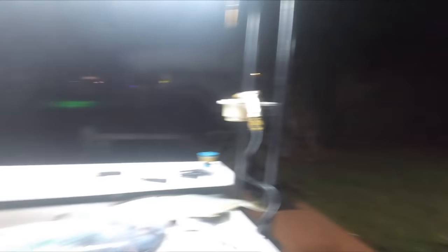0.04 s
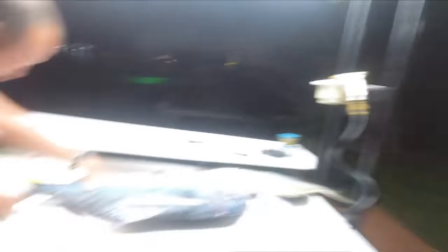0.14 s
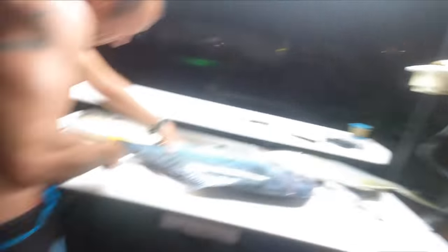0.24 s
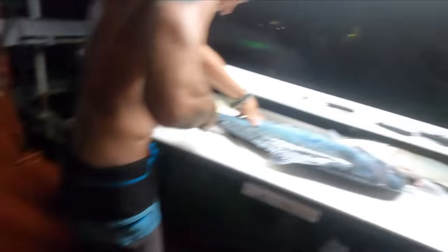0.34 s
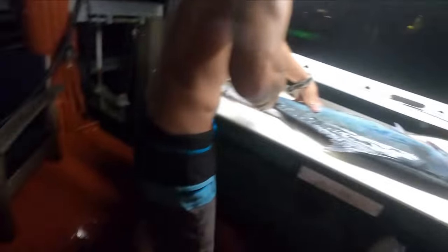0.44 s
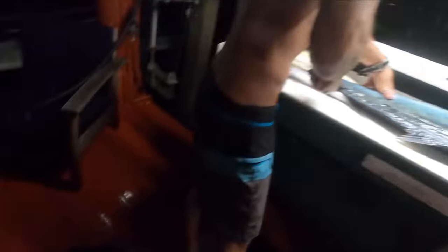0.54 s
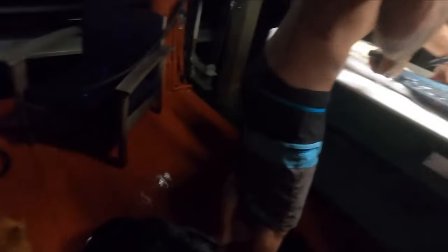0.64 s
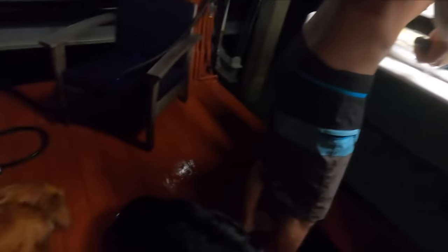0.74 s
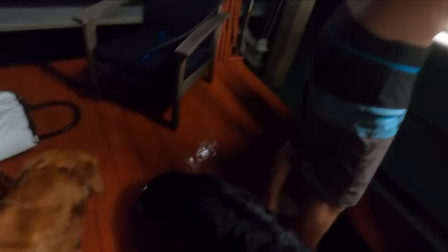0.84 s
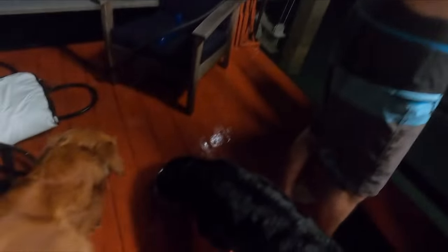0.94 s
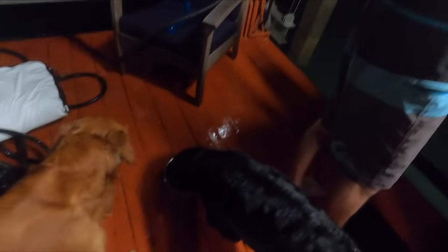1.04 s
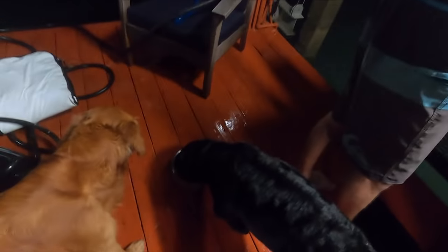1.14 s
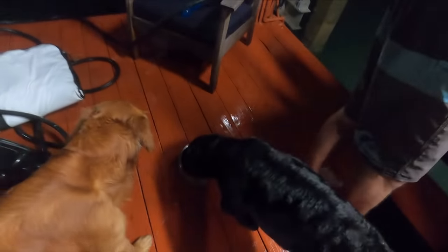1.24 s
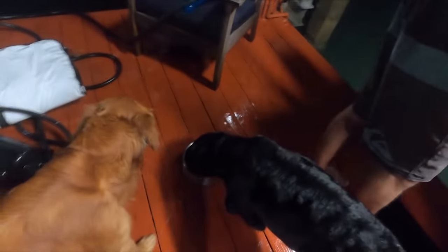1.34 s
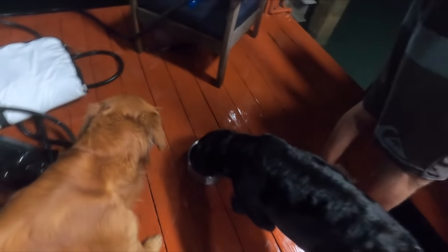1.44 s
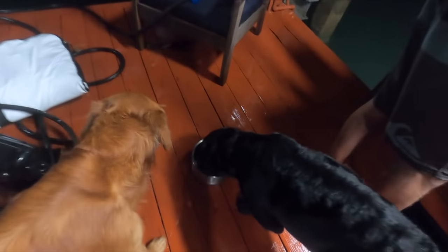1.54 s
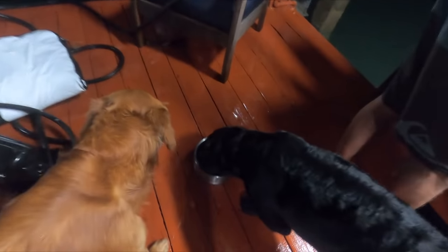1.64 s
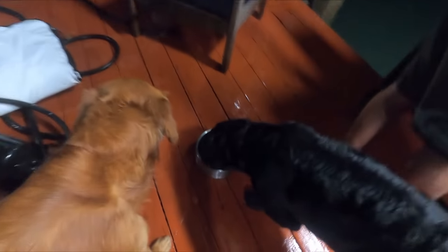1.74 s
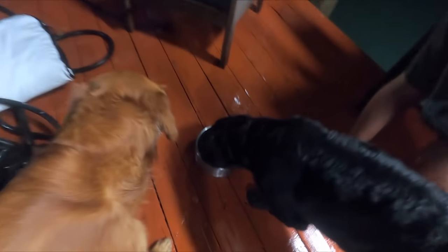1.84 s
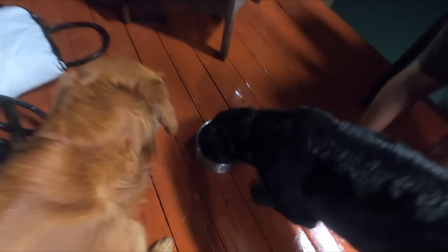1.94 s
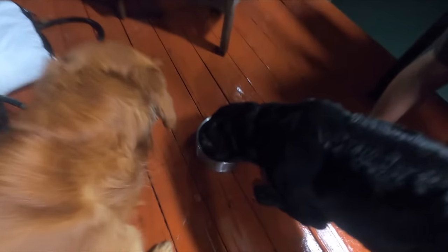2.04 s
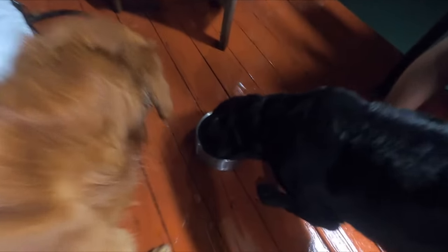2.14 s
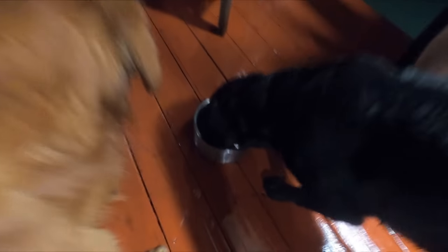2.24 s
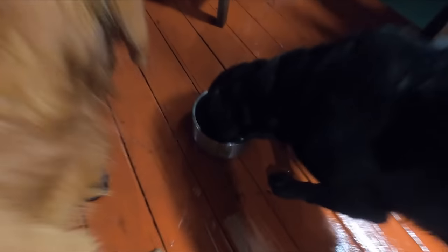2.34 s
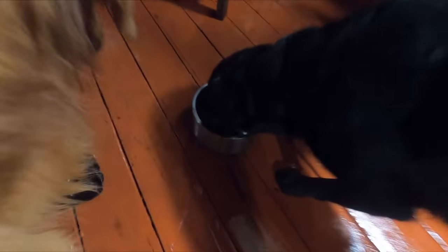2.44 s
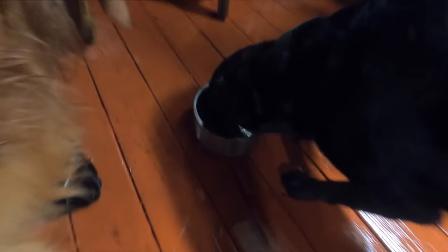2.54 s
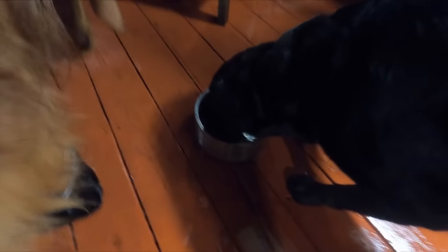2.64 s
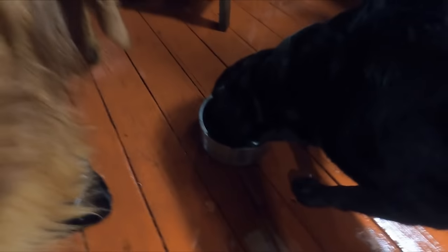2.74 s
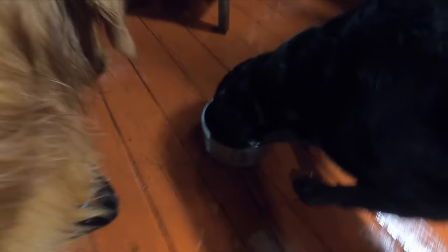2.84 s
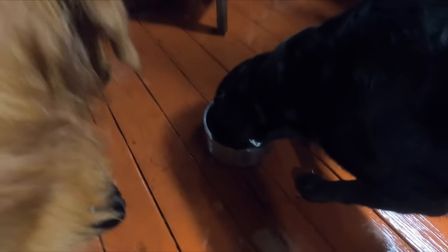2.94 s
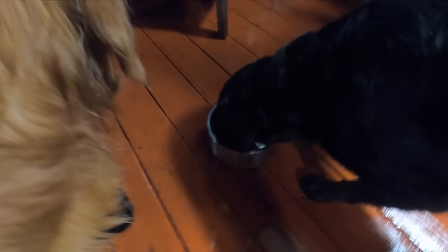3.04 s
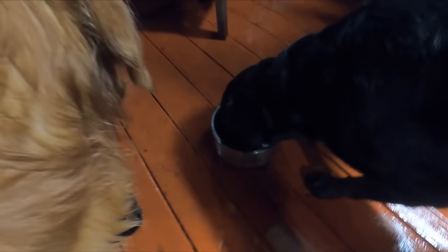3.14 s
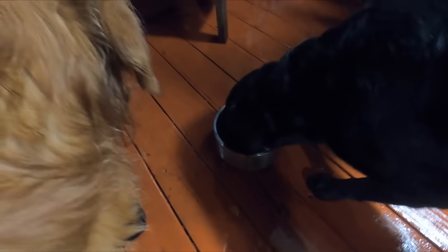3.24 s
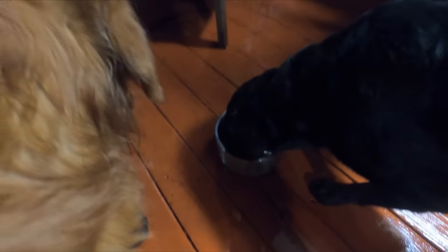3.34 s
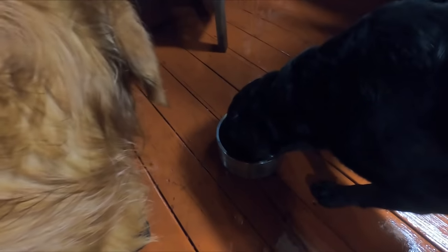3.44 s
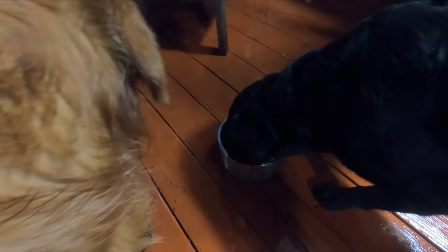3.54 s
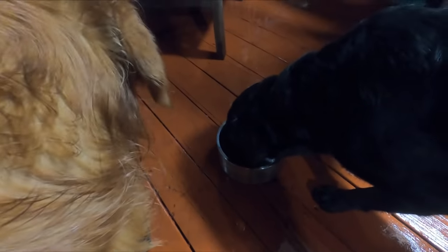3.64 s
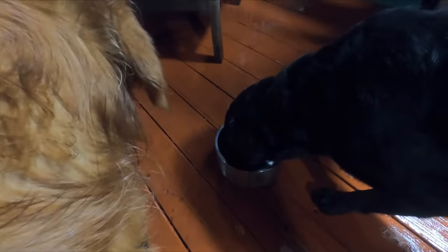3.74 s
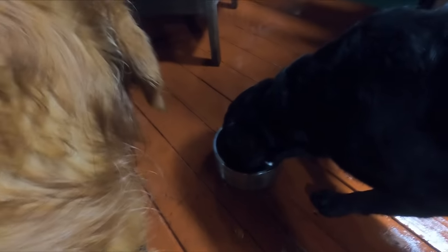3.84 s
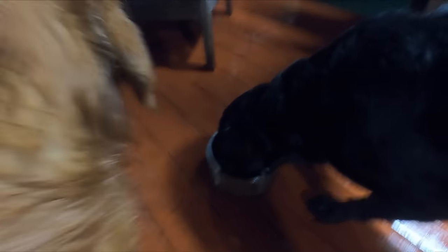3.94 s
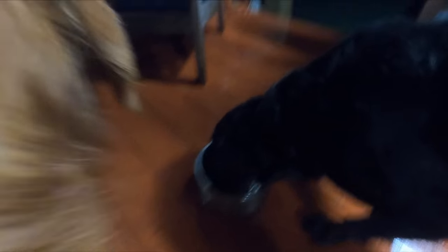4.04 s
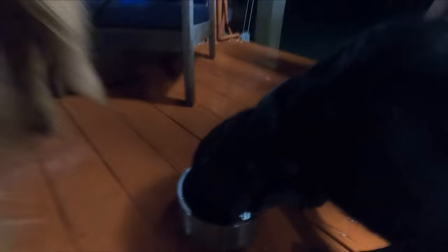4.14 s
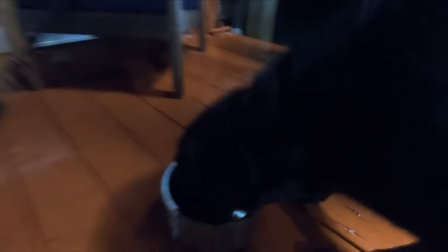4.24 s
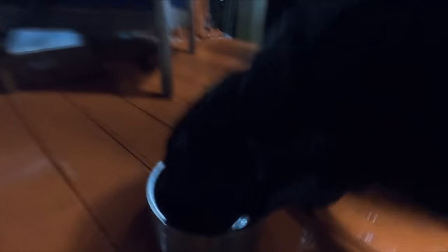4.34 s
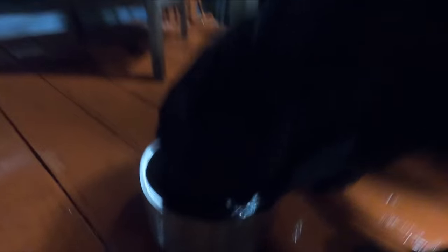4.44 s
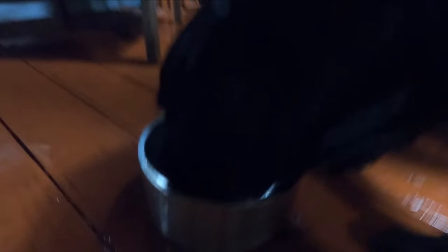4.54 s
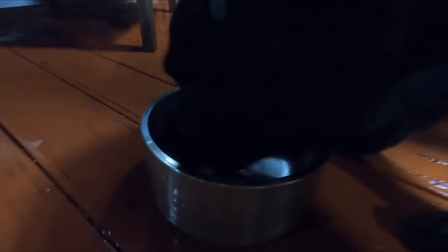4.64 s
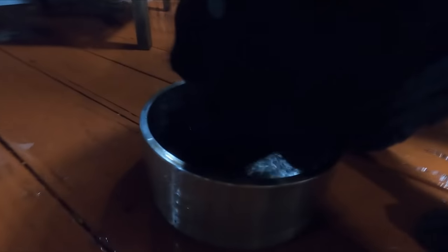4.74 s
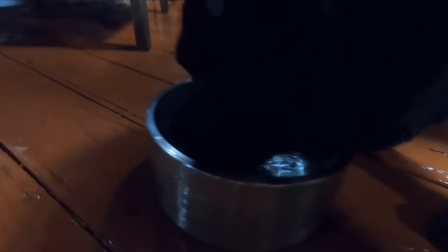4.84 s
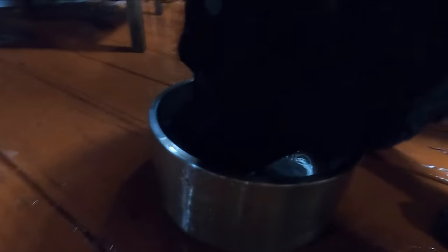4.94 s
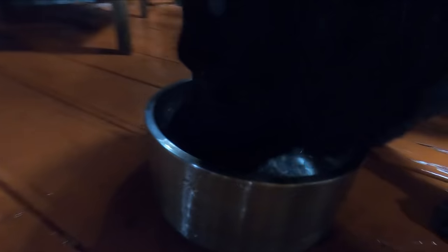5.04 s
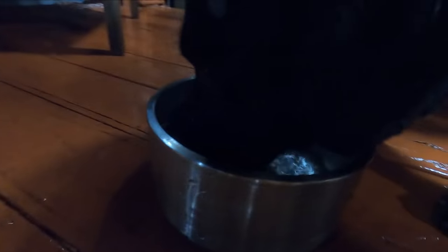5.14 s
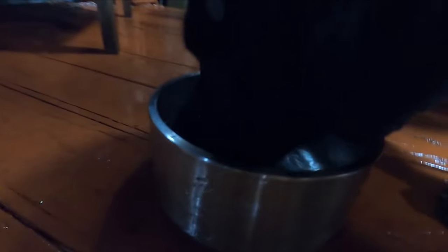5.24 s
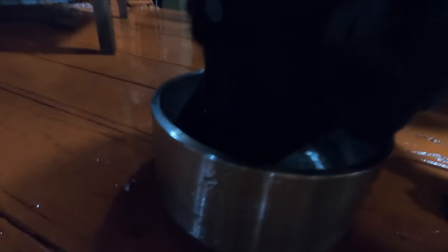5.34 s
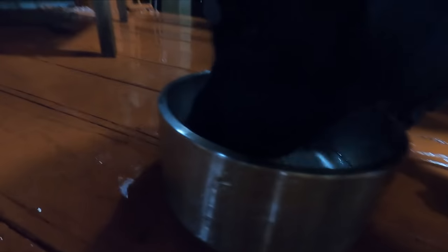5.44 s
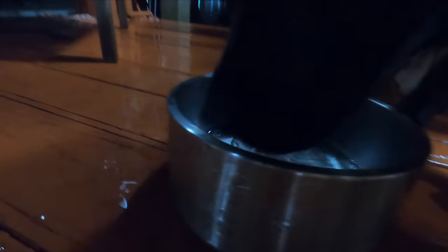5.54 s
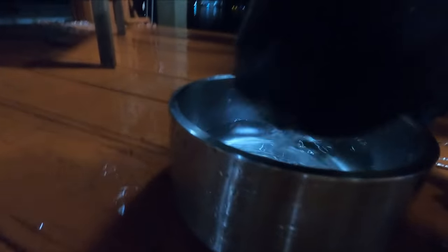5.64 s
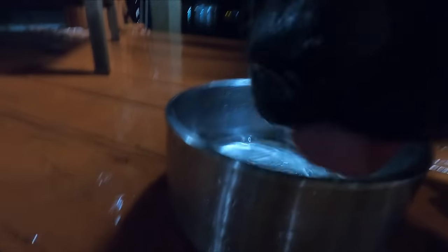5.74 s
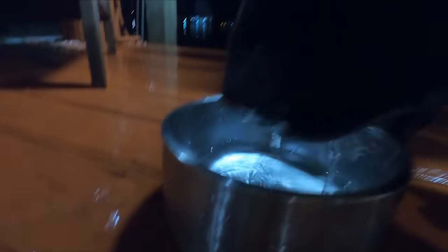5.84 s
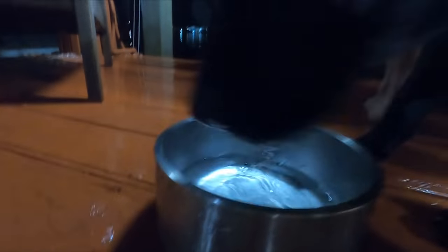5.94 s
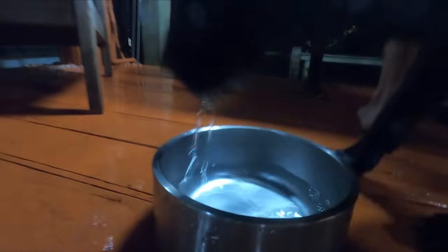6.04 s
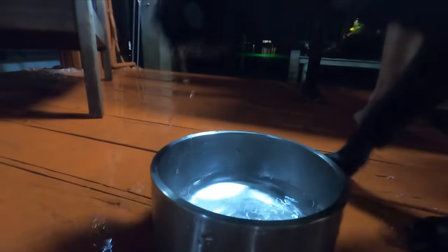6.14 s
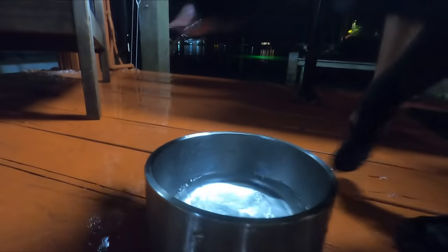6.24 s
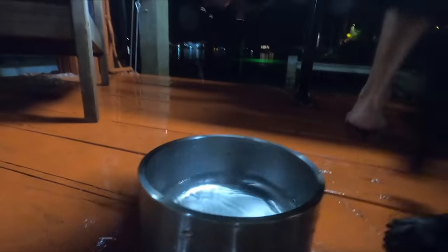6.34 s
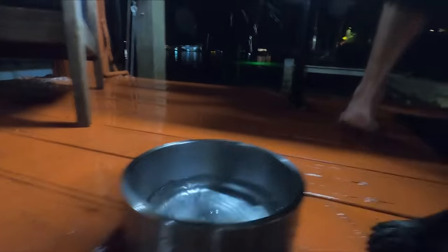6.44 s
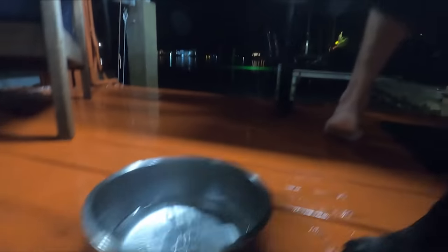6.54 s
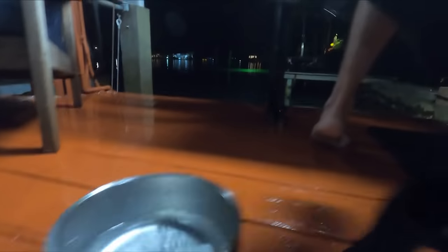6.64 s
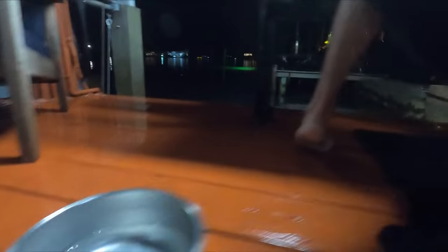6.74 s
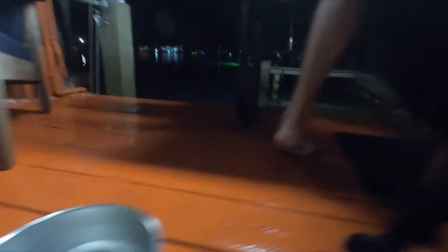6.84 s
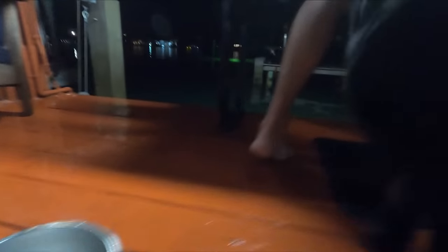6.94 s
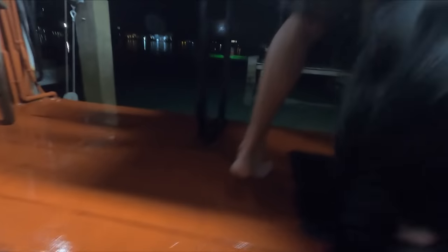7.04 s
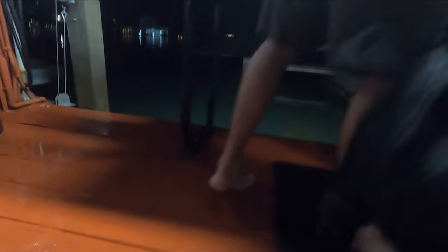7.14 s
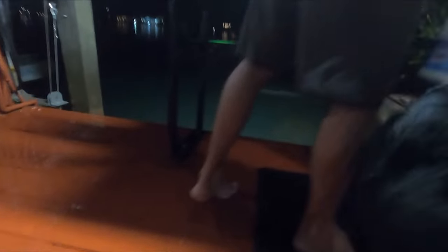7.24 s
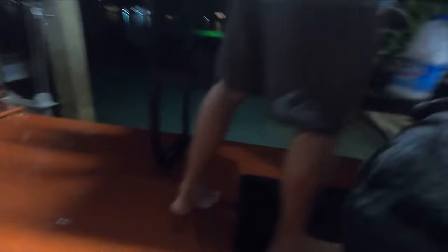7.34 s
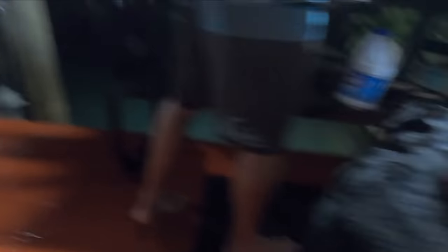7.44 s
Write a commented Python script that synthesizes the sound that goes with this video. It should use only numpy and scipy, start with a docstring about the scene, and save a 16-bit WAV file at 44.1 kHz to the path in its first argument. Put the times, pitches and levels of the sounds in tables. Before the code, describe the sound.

Outdoors at night on a wooden deck, a quiet low rumble, soft hiss, faint wavering hum and distant trickle run throughout. From 0 s a dog laps water, quietly and sparsely at first, to the left, then centred from about 1 s. Each lap, roughly three or four a second, is a tight cluster of wet slaps, short rising bubble plops, frothy gurgle and crisp spray. The laps grow fuller from 2.5 s and are loudest and closest between 4.7 and 5.5 s, with deep bubbly plunges and short bright reflections. Faint steel taps come at 5.5 and 5.7 s, and a clearer ringing knock at 6.1 s ends the drinking. Drips tick at 6.4-6.5 s and again near 6.9-7.1 s among soft paw pats. Low dull footfalls land at 6.9 and 7.35-7.45 s, while a board creaks faintly from 7.2 s to the end, about 7.5 s.

```python
"""A dog laps water fast from a steel bowl on a wooden deck at night, close to a handheld camera.
Each lap is a plunge, a pull and a snap of the tongue: noisy swarms of short rings make froth, spray and mist,
and single gliding sines the clear bubbles. Damped sines also give the knocked bowl, paws, footfalls and a
creaking board as the dog leaves; drips are short strokes. Under it all lie shaped-noise rumble and hiss,
a faint wavering hum and a distant trickle."""
import sys
import numpy as np
from scipy import signal
from scipy.io import wavfile
from scipy.ndimage import uniform_filter1d

SR = 44100
rng = np.random.default_rng(int(sys.argv[2]) if len(sys.argv) > 2 else 0)


def magnitude_from_level(level_db):
    """Linear magnitude for a level in decibels (20 dB per decade)."""
    exponent = np.asarray(level_db, float) / 20
    return 10 ** exponent


def master_out(mix):
    """Clip the mix to full scale and print it as 16-bit PCM to the path in sys.argv[1]."""
    frames = np.transpose(np.atleast_2d(mix))
    ceiling = np.clip(frames, -1, 1)
    pcm = np.round(ceiling * 32767).astype(np.int16)
    wavfile.write(sys.argv[1], SR, pcm)


N = 329679

# strokes of tongue and muzzle through the water, several to a lap:
# [t/s, relative froth level/dB, relative spray level/dB, froth t60/s]
STROKES = [(0.019, -23, -55, 0.037), (.308, -16, -43, 0.045), (.332, -21, -25.5, 0.04),
           (0.412, -26, -29, 0.071), (0.619, -26.5, -36.5, 0.52), (0.705, -36, -34, .19),
           (0.749, -19, -33, 0.033), (1.025, -19, -23, 0.091), (1.088, -26, -29, .15),
           (1.135, -13.5, -31.5, 0.068), (1.205, -27, -34, 0.05), (1.332, -23, -48, 0.14),
           (1.358, -27.5, -28.5, 0.28), (1.402, -30, -23.5, 0.075), (1.459, -18, -29, 0.045),
           (1.477, -48, -24, 0.038), (1.737, -19.5, -30, 0.22), (1.803, -38, -21.5, 0.075),
           (1.862, -23, -19.5, 0.075), (1.962, -37, -29, 0.32), (2.076, -17.5, -39, .052),
           (2.101, -32, -29, .04), (2.131, -24, -17.5, 0.046), (2.183, -26.5, -26.5, 0.28),
           (2.47, -12.5, -34, 0.1), (2.515, -25, -25, .06), (2.531, -31.5, -23.5, 0.08),
           (2.595, -20.5, -25, 0.096), (2.802, -19, -33, 0.06), (2.828, -20, -24, 0.11),
           (2.877, -14.5, -23, 0.035), (2.913, -17.5, -35, 0.16), (2.934, -31, -25, 0.042),
           (3.087, -30, -41, 0.071), (3.209, -22, -47, 0.041), (3.225, -11.5, -32, 0.082),
           (3.257, -31, -25, 0.042), (3.273, -31, -25.5, 0.36), (3.343, -14, -37, 0.056),
           (3.551, -14.5, -38, 0.15), (3.574, -14, -19, 0.03), (3.63, -19, -21, 0.06),
           (3.669, -11, -55, 0.068), (3.686, -23, -19.5, 0.032), (3.826, -22.5, -56, 0.044),
           (3.967, -13.5, -33, 0.1), (4.027, -21, -23.5, 0.19), (4.101, -18, -19.5, 0.057),
           (4.238, -23.5, -65, 0.029), (4.311, -10, -45, 0.13), (4.329, -33, -27, 0.084),
           (4.359, -41, -17.5, 0.066), (4.376, -11.5, -25, 0.032), (4.419, -17, -24.5, 0.13),
           (4.521, -29, -33.5, 0.04), (4.583, -27.5, -54, 0.14), (4.713, -3.5, -28.5, 0.067),
           (4.764, -13, -15.5, 0.1), (4.829, -10, -22, 0.068), (4.849, -27, -25.5, 0.083),
           (4.98, -21.5, -55, 0.022), (5.051, -9.5, -28, .15), (5.074, -25, -26, 0.12),
           (5.123, -10, -24, 0.031), (5.146, -45, -36, 0.028), (5.159, -10, -39, 0.067),
           (5.171, -25, -26, 0.12), (5.46, -10.5, -44, 0.063), (5.507, -11.5, -14.5, 0.019),
           (5.536, -28, -37, 0.38), (5.601, -25, -33.5, 0.14), (5.643, -46, -27, .087),
           (5.727, -56, -28.5, 0.041), (5.83, -32, -28, 0.023), (5.863, -17.5, -23.5, 0.034),
           (5.887, -14.5, -18.5, 0.037), (5.899, -10.5, -62, 0.028), (5.93, -14, -47, 0.03),
           (5.972, -28, -25.5, 0.093), (6.004, -24, -22, 0.029), (6.04, -21.5, -33, .028),
           (6.079, -27, -47, 0.044)]
# drips on the wet boards: [t/s, relative spray level/dB]
DRIPS = [(6.3666, -21), (6.4057, -26.5), (6.477, -63), (6.5053, -18), (6.8663, -22), (6.9444, -34.5),
         (7.132, -31.5)]


def evened(x):
    """Scales to rms 1."""
    return x / np.sqrt(np.mean(x ** 2) + 1e-20)


def read(points, hz):
    """Reads a spectrum on a log-frequency axis."""
    f, value = np.transpose(points)
    return np.interp(np.log(hz + 1), np.log(f + 1), value)


def add(mix, s, sound):
    """Mixes a sound in at a time in seconds."""
    part = mix[max(round(s * SR), 0):][:len(sound)]
    part += sound[:len(part)]


def ring(hz, t60, rise_s, glide=0.):
    """A damped sine with a soft start; with a glide it climbs, as a bubble does on nearing the surface."""
    t = np.arange(int(t60 * SR) + 64) / SR
    shape = (1 - np.exp(-t / max(rise_s, 1e-5))) * magnitude_from_level(-60 * t / t60)
    phase = 2 * np.pi * hz * t * (1 + glide * t / t60)
    return shape / shape.max() * np.sin(phase)


def coloured(points, patchy_db, swell_db, likeness, size, count):
    """Two-channel noise from random short-time spectra with drifting patches and a shared flicker."""
    hz = np.fft.rfftfreq(size, 1 / SR)
    a, b, c, d, patches = rng.standard_normal((4 * N // size + 5, len(hz), 5)).T
    flicker = evened(uniform_filter1d(patches[0], size=4))
    patches = uniform_filter1d(patches, size=count, axis=0)  # count bins wide
    patches = evened(uniform_filter1d(patches, size=8, axis=1))
    same = np.clip(read(likeness, hz), -1, 1)[:, None]
    left = a + 1j * b
    right = same * left + np.sqrt(1 - same ** 2) * (c + 1j * d)
    level_db = read(points, hz)[:, None] + patchy_db * patches + swell_db * flicker
    z = np.array([left, right]) * magnitude_from_level(level_db)
    return evened(signal.istft(z, nperseg=size, noverlap=size * 3 // 4)[1][:, :N])


def swarm(drive, points, per_s, spread_db, cycles):
    """Random small bubbles following the drive; each rings for about as many cycles, the largest for fewer."""
    scatter = magnitude_from_level(spread_db * np.minimum(rng.exponential(1, N), 4))
    size = drive * scatter * (rng.random(N) < per_s / SR)
    pitches = np.geomspace(points[0][0], points[-1][0], num=20)
    kind, out = rng.integers(0, len(pitches), N), np.zeros(N)
    for k, hz in enumerate(pitches):
        grain = magnitude_from_level(read(points, hz)) * ring(hz, min(cycles / hz, .035), 1.5 / hz, .15)
        out += signal.oaconvolve(size * (kind == k), grain)[:N]
    return out


def night():
    """Far off: rumble and hiss as shaped noise, and a trickle as a swarm, all drifting in level."""
    # rumble and hiss spectra: [f/Hz, relative level/dB per Hz]
    rumble_bands = [(12, -34), (20, -3), (54, 6), (81, 5), (149, -3), (340, -18.5), (471, -19.5),
                    (600, -24.5), (780, -100), (1320, -120)]
    hiss_bands = [(240, -37), (400, -34), (474, -14), (687, -6), (893, -9.5), (1010, -2.5), (1380, 3),
                  (4440, -0.5), (9610, -15), (13900, -28.5), (14800, -30), (16000, -63)]
    # distant water: [f/Hz, relative level/dB]
    trickle_bands = [(900, -18), (1500, -2), (2400, 17), (4500, 9.5), (7000, 11)]
    # likeness of the two microphone channels: [f/Hz, correlation]
    likeness = [(25, .8), (70, .92), (200, .94), (550, .8), (1650, .65), (5000, .2), (15000, .15)]
    # background drift: [t/s, rumble level/dB, hiss level/dB]
    drift = [(0.0, -43, -47.5), (0.89, -42.5, -44.5), (3.25, -42, -51), (5.04, -40, -50.5),
             (5.95, -40.5, -48), (6.62, -41, -49), (7.48, -38, -49.5)]
    s, rumble_db, hiss_db = np.transpose(drift)
    t = np.arange(N) / SR
    rumble = coloured(rumble_bands, 3., .6, likeness, size=4096, count=2)
    hiss = coloured(hiss_bands, 2.2, 1.3, likeness, size=1024, count=14)
    flow = magnitude_from_level(4.5 * evened(uniform_filter1d(rng.standard_normal(N), size=3000)))
    trickle = np.array([swarm(flow, trickle_bands, 500, 6.7, 53.0) for _ in range(2)])
    trickle = magnitude_from_level(-8.5) * evened(trickle)
    watery = hiss + trickle + 0.33 * trickle[::-1]  # each channel leaks into the other
    return rumble * magnitude_from_level(np.interp(t, s, rumble_db)) + watery * magnitude_from_level(np.interp(t, s, hiss_db))


def hum():
    """A faint low sine whose pitch wavers and whose level comes up over the first two seconds."""
    t = np.arange(N) / SR
    drift = evened(uniform_filter1d(rng.standard_normal(N), size=9000))
    turns = np.cumsum(129.6 + 1.2 * drift) / SR  # centre and rms wander in Hz
    return magnitude_from_level(-52.5) * np.clip(t / 1.9, .3, 1) * np.sin(2 * np.pi * turns)


def deck(x):
    """Short bright reflections off bowl, boards and furniture, different for each ear."""
    taps = np.zeros((2, 6000))
    at = np.arange(40, 5980, 20) + rng.integers(0, 20, (2, 297))
    np.put_along_axis(taps, at, rng.choice([-1., 1.], at.shape), 1)
    tail = taps * magnitude_from_level(-60 * np.arange(6000) / SR / .06)  # t60 of 60 ms
    tail = tail / np.linalg.norm(tail[0])
    tail = signal.lfilter([1, -.8], [1], tail)  # bass wraps round and stays direct
    return signal.fftconvolve(x[None], tail, axes=1)[:, :N]


def creak():
    """A board under load slips a few times in a row, each slip ringing the wood briefly."""
    # slips: [t/s, peak level/dB, f/Hz]
    slips = [(7.225, -47, 1100), (7.262, -43, 1030), (7.281, -49, 433), (7.312, -46, 490),
             (7.351, -39.5, 447), (7.388, -43.5, 453)]
    out = np.zeros(N)
    for s, db, hz in slips:
        add(out, s, magnitude_from_level(db) * ring(hz, 0.039, 0.003))
    return out


def footfalls():
    """Heels push the boards: short, very low damped sines."""
    # footfalls through the boards: [t/s, peak level/dB, f/Hz]
    heels = [(6.89, -27, 41.8), (7.347, -33, 44.4), (7.449, -22, 37.3)]
    out = np.zeros(N)
    for s, db, hz in heels:
        add(out, s, magnitude_from_level(db) * ring(hz, 0.13, 0.017))
    return out


def paws():
    """Soft pads pat the boards: lighter, shorter damped sines."""
    # pats: [t/s, peak level/dB, f/Hz]
    pads = [(6.056, -35.5, 257), (6.288, -36, 298), (6.575, -44, 560), (6.875, -38, 445), (7.032, -43, 420),
            (7.138, -36.5, 260)]
    out = np.zeros(N)
    for s, db, hz in pads:
        add(out, s, magnitude_from_level(db) * ring(hz, 0.038, 0.004))
    return out


def bowl():
    """The steel wall rings on after a knock; where it is struck favours some modes, each a beating pair."""
    # modes of the steel wall: [f/Hz, relative level/dB, t60/s]
    modes = [(690, 4, 0.46), (1120, -7, 0.48), (1475, -7.5, 1.0), (1870, -2, 0.27), (2350, 3, 0.62),
             (2970, 4, 0.73)]
    # muzzle on the bowl: [t/s, level before the mode levels/dB, favoured f/Hz]
    knocks = [(5.54, -55, 2960), (5.726, -53, 2400), (5.99, -54, 2300), (6.032, -50.5, 2350),
              (6.077, -34, 1520)]
    out = np.zeros(N)
    for s, db, best_hz in knocks:
        for hz, mode_db, t60 in modes:
            pair = ring(hz, t60, .002) + .3 * ring(hz * 1.007, t60, .002)
            off_db = -27 * abs(np.log2(hz / best_hz))  # per octave from the favoured pitch
            add(out, s, magnitude_from_level(db + mode_db + off_db) * pair)
    return out


def blows():
    """Every disturbance of water as columns: time, froth dB, spray dB, froth t60, spray t60."""
    # droplets fall for a fixed time plus a share of the stroke
    strokes = [(s, froth_db, spray_db, t60, .035 + .25 * t60) for s, froth_db, spray_db, t60 in STROKES]
    # a drip is a short stroke that is mostly spray
    drips = [(s, db - 2.5, db, 0.025, 0.025) for s, db in DRIPS]
    return np.transpose(strokes + drips)


def stirring(events, rise_s, slosh_db, slosh_s):
    """How hard water is thrown: a build-up, a rise and a decay for every blow, joined by a looser slosh."""
    build_s, build_db = 0.0052, -14  # water piles up just before it breaks
    out, before = np.zeros(N), np.arange(-4 * build_s, 0, 1 / SR)
    for s, db, t60 in events:
        t60 = max(t60, .01)
        t = np.arange(int(t60 * SR)) / SR
        add(out, s, magnitude_from_level(db - 60 * t / t60) * (1 - np.exp(-t / rise_s)))
        add(out, s + before[0], magnitude_from_level(db + build_db) * np.exp(before / build_s))
    spread = signal.windows.hann(int(slosh_s * SR))
    slosh = abs(signal.oaconvolve(out, spread / spread.sum(), "same"))
    return out + magnitude_from_level(slosh_db) * slosh


def ticks(times, levels_db):
    """The dry crack at the instant the water breaks: fast-fading band-passed noise."""
    t, out = np.arange(300) / SR, np.zeros(N)
    band = signal.butter(3, [1300, 6800], "bandpass", fs=SR)
    for s, db, noise in zip(times, levels_db, rng.standard_normal((len(times), len(t)))):
        crack = evened(signal.lfilter(*band, noise)) * magnitude_from_level(-60 * t / 0.0076)
        add(out, s, magnitude_from_level(db) * crack)
    return out


def mist():
    """The finest droplets follow both froth and spray, by less; separate swarms leak between the channels."""
    # finest droplets: [f/Hz, relative level/dB]
    mist_bands = [(5000, 4.5), (7500, 2), (10000, -6.5), (13000, -17), (15500, -18)]
    # the faint mist carries better as the camera dips to the water: [t/s, level/dB]
    closeness = [(0, 2.5), (2.4, 4), (4.2, 1.5), (4.77, 1.5), (5.2, 2), (7.48, 1.5)]
    s, froth_db, spray_db, _, t60 = blows()
    mist_db = -28 + 0.48 * froth_db + 0.51 * spray_db
    fine = stirring(zip(s, mist_db, t60), 0.0012, -2.1, 0.11)
    fine = fine * magnitude_from_level(np.interp(np.arange(N) / SR, *np.transpose(closeness)))
    pair = np.array([swarm(fine, mist_bands, 2300, 4.85, 27.6) for _ in range(2)])
    return pair + 0.25 * pair[::-1]


def spray():
    """Droplets burst all over the surface with dry cracks; the two ports hear partly different ones."""
    # droplets: [f/Hz, relative level/dB]
    spray_bands = [(1500, -4.5), (2500, 2.5), (4000, 5), (6000, -7.5), (8000, -23)]
    s, _, spray_db, _, t60 = blows()
    coarse = magnitude_from_level(-15) * stirring(zip(s, spray_db, t60), 0.0019, 0.13, 0.13)
    shared, left, right = (swarm(coarse, spray_bands, 2200, 3.5, 36.) for _ in range(3))
    # crack level re spray in dB: a drip on wood is mostly crack
    crack_db = np.repeat([-5, 1.5], [len(STROKES), len(DRIPS)])
    shared = shared + ticks(s, spray_db + crack_db)
    # left port two samples late
    return np.array([np.roll(shared, 2), shared]) + 0.18 * np.array([left, right])


def pushes():
    """The dull shove of the tongue: a short low ring under every stroke, each at its own pitch."""
    out = np.zeros(N)
    for (s, froth_db, _, _), hz in zip(STROKES, rng.uniform(135.84, 324, len(STROKES))):
        add(out, s, magnitude_from_level(froth_db - 20) * ring(hz, 0.029, 0.0019))
    return out


def froth():
    """The gurgle released by each splash: a swarm of small bubbles driven by the stirred water."""
    # small bubbles: [f/Hz, relative level/dB]
    froth_bands = [(250, -21), (500, -9.5), (1100, 0), (1700, -3), (2500, -7), (4000, -29), (7000, -22)]
    s, froth_db, _, t60, _ = blows()
    drive = stirring(zip(s, froth_db, t60), 0.0012, -2.65, 0.048)
    return magnitude_from_level(-18) * swarm(drive, froth_bands, 2000, 3.8, 25.4)


def bubbles():
    """The large bubbles, each one clear note climbing in pitch."""
    # loudest air pockets, ringing as they are pinched off:
    # [t/s, peak level/dB, starting f/Hz, t60/s (at least 5 ms is used)]
    pockets = [(0.1325, -30, 2930, 0.0054), (0.306, -26.5, 1420, .043), (0.4166, -26.5, 2350, 0.0058),
               (0.633, -29, 360, 0.017), (0.7162, -24.5, 1550, 0.0089), (1.0336, -21, 1220, 0.019),
               (1.088, -31.5, 619, 0.12), (1.139, -22.5, 2340, 0.029), (1.138, -21.5, 1710, 0.0096),
               (1.3562, -12.5, 1270, 0.0079), (1.363, -27.5, 1446, 0.055), (1.4013, -32, 2420, .012),
               (1.412, -26, 1200, 0.029), (1.4628, -23, 2550, 0.0076), (1.7354, -19.5, 1010, 0.014),
               (1.7406, -16, 1440, 0.0085), (1.7553, -26.5, 753, 0.046), (1.8053, -20, 2970, 0.006),
               (1.8064, -16.5, 1760, 0.004), (1.8734, -24, 2380, .01), (1.8825, -21.5, 2440, 0.0076),
               (2.0802, -16.5, 1470, 0.0078), (2.1025, -21.5, 3880, 0.0057), (2.0715, -27, 1250, 0.018),
               (2.1313, -18, 3060, 0.012), (2.133, -33, 620, 0.034), (2.184, -25.5, 3550, .018),
               (2.4683, -19, 890, 0.015), (2.4713, -21.5, 2530, .018), (2.4772, -20, 770, 0.027),
               (2.48, -18, 1265, 0.031), (2.5337, -20, 2480, 0.024), (2.6037, -23, 1210, 0.0098),
               (2.802, -12, 1025, 0.013), (2.811, -11, 920, 0.0067), (2.827, -21.5, 580, 0.015),
               (2.832, -23, 853, 0.059), (2.878, -25.5, 2420, 0.031), (2.8803, -15, 590, 0.045),
               (2.9142, -18.5, 460, .0072), (2.9252, -20, 550, 0.023), (2.933, -23, 2860, 0.0069),
               (3.2091, -20.5, 1070, 0.035), (3.226, -17, 1350, 0.016), (3.238, -23.5, 600, 0.038),
               (3.2738, -22.5, 6160, 0.0042), (3.286, -28.5, 2560, .018), (3.313, -29, 1564, 0.037),
               (3.3468, -22.5, 1140, 0.012), (3.5575, -16, 1120, 0.011), (3.5708, -23, 619, 0.073),
               (3.5725, -22.5, 3300, 0.023), (3.6035, -21, 1600, 0.035), (3.635, -21, 622, .047),
               (3.6888, -17.5, 2260, 0.015), (3.963, -22, 1180, 0.034), (3.9926, -20, 1490, 0.013),
               (4.03, -17.5, 3150, 0.0045), (4.037, -17, 1870, 0.0096), (4.103, -17.5, 1820, .015),
               (4.3087, -16.5, 1010, 0.011), (4.326, -14, 1230, 0.0062), (4.3291, -18, 440, 0.041),
               (4.33, -21, 1035, 0.03), (4.361, -20, 3820, 0.0066), (4.3779, -12.5, 2330, .011),
               (4.382, -16.5, 1650, .018), (4.588, -28.5, 455, 0.011), (4.611, -30.5, 432, 0.025),
               (4.7131, -12, 1330, 0.0093), (4.7528, -20.5, 2180, 0.021), (4.763, -13.5, 2480, 0.016),
               (4.7744, -9, 1870, 0.0046), (4.83, -23, 2220, 0.0052), (4.836, -16, 427, 0.004),
               (4.8508, -15, 1195, 0.013), (5.0498, -11.5, 980, 0.023), (5.06, -15.5, 1170, 0.052),
               (5.0715, -9.5, 817, 0.016), (5.0744, -20, 1700, 0.043), (5.0742, -22, 2410, 0.026),
               (5.0927, -18, 2300, .0073), (5.1253, -14.5, 1685, 0.019), (5.1262, -14, 633, 0.021),
               (5.156, -17.5, 553, 0.014), (5.1452, -24, 2920, 0.01), (5.1627, -27, 2250, .032),
               (5.1714, -23, 1120, 0.031), (5.4698, -8.5, 1040, 0.0068), (5.5041, -14.5, 2040, 0.0076),
               (5.5062, -18.5, 3080, 0.014), (5.526, -23, 2080, .008), (5.535, -21.5, 3250, 0.031),
               (5.6454, -13.5, 4020, 0.004), (5.6547, -22.5, 2240, 0.015), (5.8298, -23.5, 3280, 0.006),
               (5.8694, -25, 1330, 0.022), (5.9004, -15.5, 695, 0.03), (5.927, -27, 635, 0.038),
               (6.004, -27, 310, 0.052), (6.0406, -23, 2100, 0.015), (6.078, -23, 1362, 0.074),
               (6.081, -34, 1020, 0.078), (6.3668, -22.5, 4620, 0.004), (6.3743, -21.5, 1580, 0.0075),
               (7.134, -34.5, 1600, 0.042)]
    out = np.zeros(N)
    for s, db, hz, t60 in pockets:
        add(out, s, magnitude_from_level(db) * ring(hz, max(t60, .005), 0.0011, 0.058))
    return out


def scene():
    """The bowl lies close, a little to the right: the left port hears it two samples late."""
    # bearing as the camera turns: [t/s, left minus right level/dB]
    bearing = [(0.0, 7.5), (1.04, -1.0), (4.66, -0.5), (5.75, -2), (7.48, 5.5)]
    near = bubbles() + froth() + pushes() + bowl() + creak()
    lean_db = np.interp(np.arange(N) / SR, *np.transpose(bearing)) / 2
    direct = np.array([np.roll(near, 2), near])
    close = direct + spray() + mist() + magnitude_from_level(1.0) * deck(near)
    return close * magnitude_from_level([lean_db, -lean_db]) + footfalls() + paws() + hum() + night()


def low_pass(x):
    """Removes everything above the highest recorded frequency."""
    return signal.sosfilt(signal.butter(12, 16460, fs=SR, output="sos"), x)


def record(dry):
    """The camera's microphone channel passes nothing much above 16 kHz."""
    edge = signal.firwin(511, 16000, window=("kaiser", 9), fs=SR)
    mix = signal.oaconvolve(dry, edge[None], "same")
    return low_pass(mix)


dry = scene()
out = record(dry)
master_out(out)
```